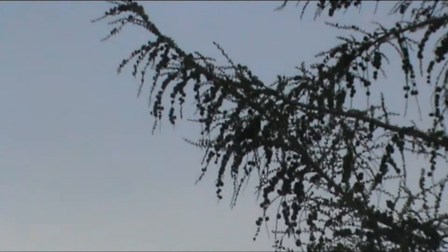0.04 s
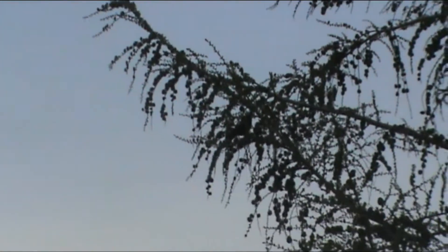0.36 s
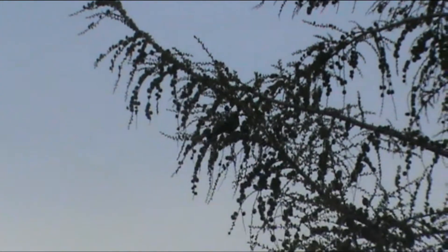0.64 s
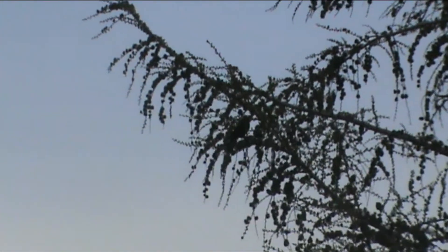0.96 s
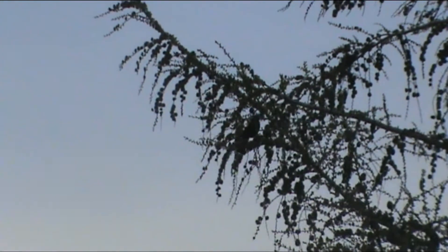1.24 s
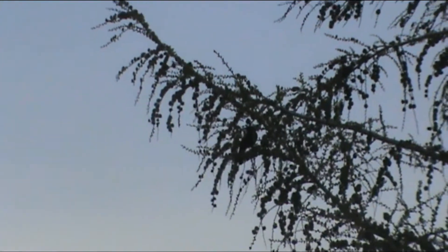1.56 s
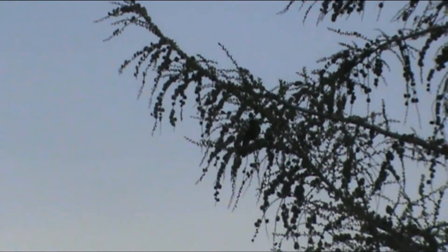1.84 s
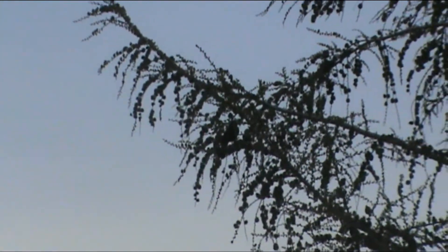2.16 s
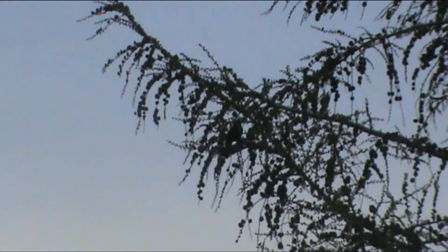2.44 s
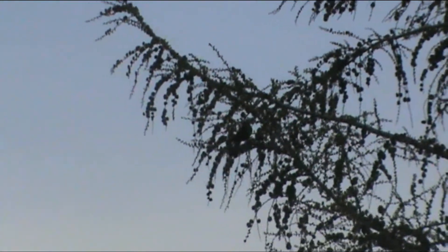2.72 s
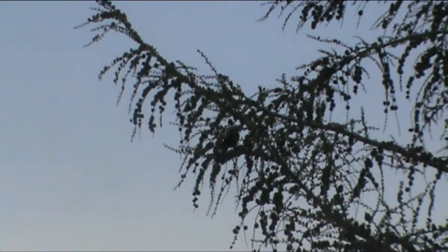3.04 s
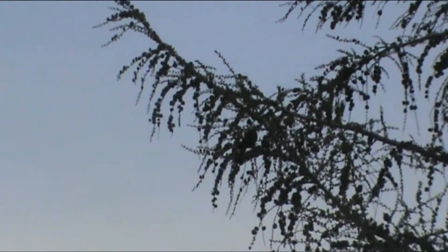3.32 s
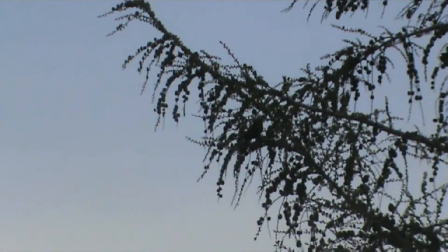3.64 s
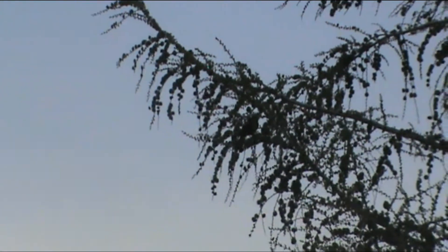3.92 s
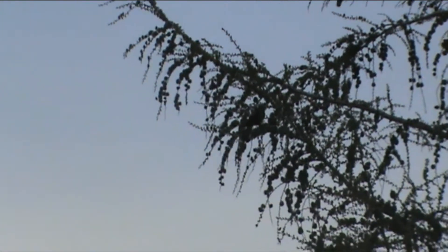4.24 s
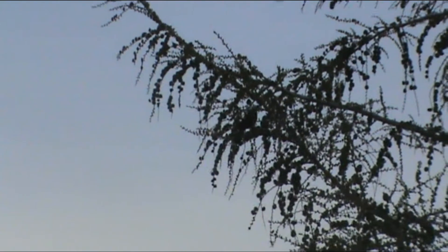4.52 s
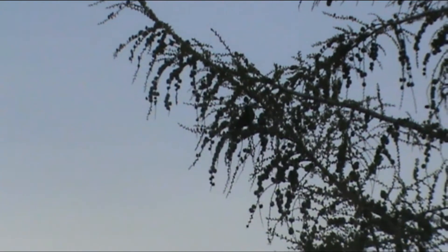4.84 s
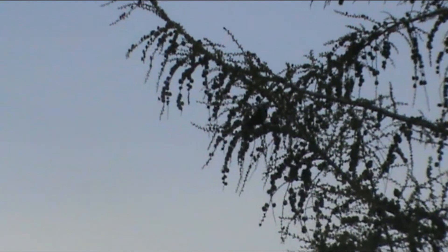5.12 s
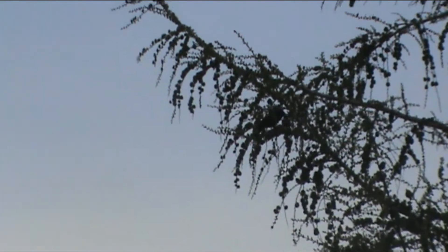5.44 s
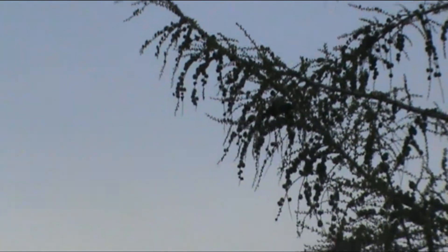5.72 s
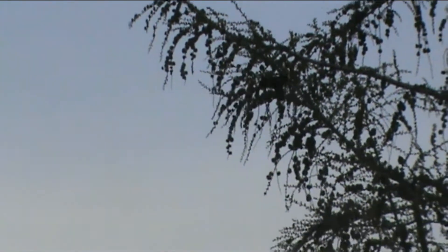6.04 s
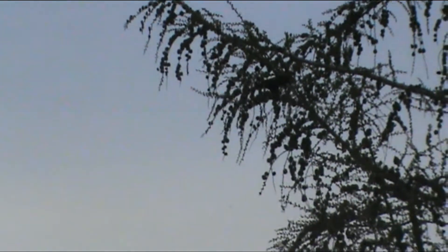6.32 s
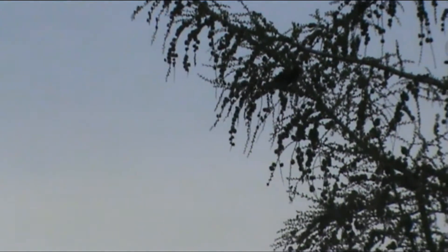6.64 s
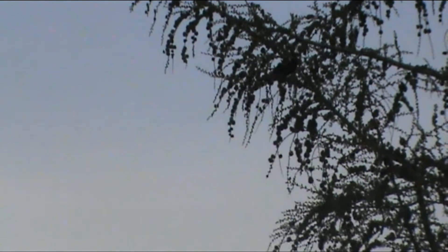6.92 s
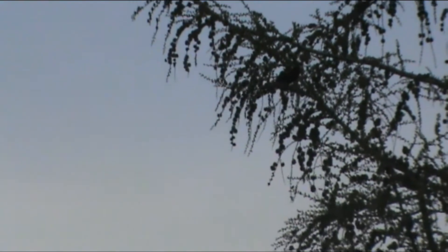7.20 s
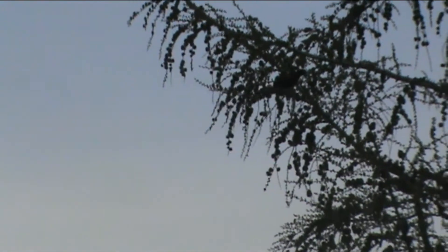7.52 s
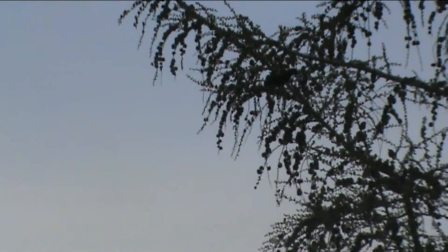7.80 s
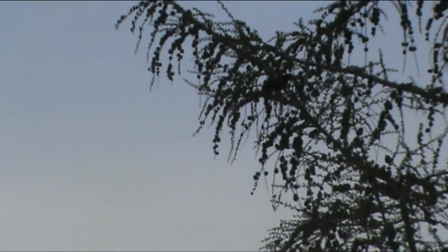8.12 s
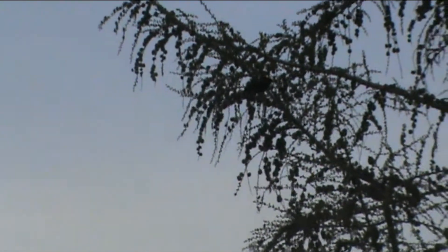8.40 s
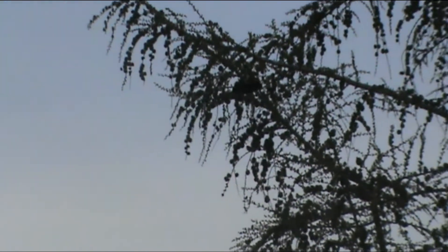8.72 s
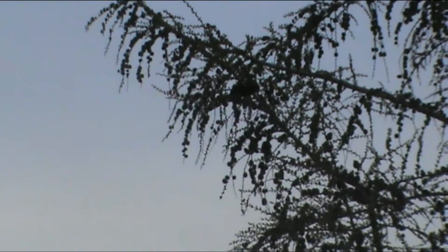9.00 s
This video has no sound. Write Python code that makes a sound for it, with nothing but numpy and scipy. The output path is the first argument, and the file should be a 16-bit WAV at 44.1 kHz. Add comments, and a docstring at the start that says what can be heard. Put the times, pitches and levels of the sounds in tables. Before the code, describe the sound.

Quiet distant traffic, leaf hiss, a low wavering hum and a hand-held camera's thin whine sound throughout. After a faint peep, a small bird in a larch whistles three quick, high, down-slurred notes at about 1 second, much louder than the background. Birds further off answer from 1.5 to 3 seconds, with a slight woodland echo. Twigs snap lightly near 3.3 and 4.8 seconds, and short raspy chips come near 2.4, 4.6 and 5.9. A faint far engine passes around 6 seconds, sinking in pitch. The near bird repeats its run at 6.3, overlapped by an answer, and faint calls follow. A hand softly bumps the camera near 3.4, 7 and 9 seconds. A small metal ring clinks against it faintly at 4.4, then several times from about 8.3. Just after 9 seconds the near bird whistles two more notes, along with a chip and a clink.

```python
"""Distant traffic, leaf hiss, a hum and a hand-held camera's thin whine sound throughout. Faint peeps
begin, then a small bird in a larch whistles a quick run of three down-slurred notes. A twig snaps,
birds answer from further off, and raspy chips follow. The hand bumps the camera and a metal ring
clinks on it. A far engine, sinking in pitch, passes at about 6 s; the birds call again, and the near
one starts a last run amid more clinks and bumps."""
import sys
import numpy as np
from scipy import signal
from scipy.fft import rfft, irfft
from scipy.io import wavfile
from scipy.ndimage import uniform_filter1d

SR = 44100
rng = np.random.default_rng(int(sys.argv[2]) if len(sys.argv) > 2 else 0)


def to_wav(sig):
    """Store sig (one row per channel, or 1-D mono) as 16-bit WAV at the path in sys.argv[1].

    Samples outside -1..1 are clipped; the rate is SR.
    """
    pcm = np.clip(np.atleast_2d(sig), -1, 1) * 32767
    pcm = np.round(pcm).astype(np.int16)
    wavfile.write(sys.argv[1], SR, pcm.T)  # frames by channels


N = 408366
TIME = np.arange(N) / SR


def gain_of(db):
    """Amplitude ratio of a level in decibels."""
    return 10 ** (np.asarray(db) / 20)


def unit_rms(x):
    """Normalisation to unit mean power."""
    return x / np.sqrt(np.mean(x ** 2) + 1e-20)


def curve_at(points, hz):
    """Linear interpolation on a log-frequency axis."""
    f, value = np.transpose(points)
    return np.interp(np.log(hz + 1), np.log(f + 1), value)


def add(mix, start_s, sound):
    """Superposition: a sound adds to the mix from start_s on."""
    part = mix[max(round(start_s * SR), 0):][:len(sound)]
    part += sound[:len(part)]


def phase_of(hz):
    """Phase is the time integral of frequency."""
    return 2 * np.pi * np.cumsum(hz) / SR


def noise(size, colour):
    """Spectral shaping: white noise weighted by colour(Hz) in dB, at unit power."""
    hz = np.fft.rfftfreq(size, 1 / SR)
    return unit_rms(irfft(rfft(rng.standard_normal(size)) * gain_of(colour(hz)), size))


def wander(size, hz):
    """Low-pass noise: a random drift with its cutoff at hz."""
    return noise(max(size, SR), lambda f: -20 * np.log10(1 + (f / hz) ** 4))[:size]


def band(size, hz, octaves):
    """Band-pass noise, 6 dB down at the given octaves either side of hz."""
    return noise(size, lambda f: -20 * np.log10(1 + (np.log2((f + 1) / hz) / octaves) ** 2))


def air(spectrum, db, motion, patchy_db):
    """Partly coherent stereo noise with drifting patches; motion scales the traffic's lull and hump."""
    # likeness of the two channels: (frequency [Hz], coherence [0-1])
    coherence = [(30, 0.98), (110, 1), (200, .92), (350, 0.55), (700, .5), (1400, 0.214), (2800, 0.033),
                 (5000, 0.12), (9000, 0.47), (13000, 1), (16000, 1)]
    # balance of the air: (frequency [Hz], left over right [dB])
    balance = [(30, -0.5), (250, -0.4), (700, 0.9), (2800, 0.3), (5000, 0), (9000, 0), (16000, -.2)]
    frames, hz = N // 512 + 5, np.fft.rfftfreq(2048, 1 / SR)
    t = np.linspace(0, N / SR, frames)[:, None]
    a, b, c, d, patches = rng.standard_normal((5, frames, len(hz)))
    patches = unit_rms(uniform_filter1d(uniform_filter1d(patches, size=10, axis=0), size=16, axis=1))
    alike = np.clip(curve_at(coherence, hz), -1, 1)
    left, independent = a + 1j * b, c + 1j * d
    spectra = np.array([left, alike * left + np.sqrt(1 - alike ** 2) * independent])
    lull = -1.6 * np.exp(-((t - 5.6) / 1.1) ** 2) * hz / (hz + 250)  # the tyre roar eases once
    hump_hz = 685 + (1130 - 685) * (1 - np.tanh((t - 4.3) / .9)) / 2  # sinks as a vehicle goes by
    hump = 2.2 * np.exp(-(np.log2((hz + 1) / hump_hz) / .16) ** 2)
    spectra *= gain_of(curve_at(spectrum, hz) + patchy_db * patches + motion * (lull + hump))
    spectra *= gain_of(np.outer([.5, -.5], curve_at(balance, hz)))[:, None]
    pair = signal.istft(spectra.transpose(0, 2, 1), nperseg=2048, noverlap=1536)[1][:, :N]
    return gain_of(db) * unit_rms(pair)


def traffic_and_leaves():
    """Broadband noise: distant traffic fills the bass and middle, leaves the treble."""
    # spectra of traffic and of leaves: (frequency [Hz], relative spectral density [dB])
    wash = [(12, -30), (22, -17), (38, -13.5), (50, -6), (90, -2.5), (125, -4.5), (200, -7), (330, -13),
            (490, -10.5), (750, -11.5), (1400, -15.5), (2050, -19), (2500, -22), (3300, -47.5)]
    hiss = [(1500, -34.5), (2400, -15), (2700, 2), (3300, 1), (4200, -1.5), (6000, -4), (9000, -5.5),
            (13000, -7.5), (15000, -7), (15800, -4.5)]
    return air(wash, db=-49.5, motion=.93, patchy_db=.73) + air(hiss, db=-58.5, motion=.57, patchy_db=.7)


def engine():
    """Doppler shift: a steadily sinking drone drops further as it passes, where it is loudest."""
    start_hz, sink_hz_per_s, drop_hz, pass_s = 286.5, 9.3, 15.5, 6.05
    since = TIME - pass_s
    hz = start_hz - sink_hz_per_s * TIME - drop_hz * (1 + np.tanh(since / .5)) / 2
    hz *= 1 + .0061 * wander(N, 8.1)
    db = -63.5 + 6.5 / (1 + (since / 1.45) ** 2)
    return gain_of(db + 2 * wander(N, 5.5)) * np.sin(phase_of(hz))


def hum():
    """Random amplitude and frequency modulation make a low tone waver."""
    db = -59.5 + 2 * wander(N, 3.4)
    hz = 101.7 + 2.62 * wander(N, 4.9)
    return gain_of(db) * np.sin(phase_of(hz))


def camera_whine():
    """Two close tones beat at their difference frequency."""
    hz, db = (15735, 15748.4), (-64.5, -70)
    return gain_of(db) @ np.sin(2 * np.pi * np.outer(hz, TIME))


def peeps(sag, hoarse_hz, stray_count):
    """Random frequency modulation makes faint, sagging bird notes hoarse; fainter strays fall by chance."""
    # faint calls: (time [s], level [dB], pitch [Hz])
    calls = [(.439, -51, 3570), (.966, -53, 3050), (2.0, -53, 3150), (2.794, -54, 2100), (3.298, -55, 2750),
             (5.083, -53, 2120), (5.22, -54.5, 2810), (7.267, -49, 1339), (7.312, -51, 1430),
             (7.415, -53, 1607), (7.946, -53.5, 3040), (8.248, -51, 2990)]
    strays = [(when * N / SR, -62, np.interp(high, [0, 1], (2700, 3900)))
              for when, high in rng.random((stray_count, 2))]
    out, cycles = np.zeros(N), 85
    for centre_s, db, hz in calls + strays:
        length = cycles / hz  # lower peeps last longer
        u = np.linspace(-1, 1, int(length * SR))
        pitch = hz * (1 - sag * u / 2) + hoarse_hz * wander(len(u), 400)
        add(out, centre_s - length / 2, gain_of(db) * np.cos(np.pi * u / 2) * np.sin(phase_of(pitch)))
    return out


def outdoors(x, branches_db, decay_s, wood_db):
    """Reverberation: quick reflections off branches and the wood's tail, in dB against the direct sound."""
    # decay of the wood: (frequency [Hz], reverberation time [s])
    wood_t60 = [(500, 0.55), (3000, .5), (5000, 0.83), (10000, .5), (16000, .3)]
    t = np.arange(SR) / SR
    twigs, trunks = rng.standard_normal((2, 2, SR)) * (rng.random((2, 2, SR)) < 2000 / SR)
    quick = twigs * np.exp(-t / decay_s) * (t > .002)
    hz, when, spectra = signal.stft(trunks * np.minimum(t / .027, 1), SR, nperseg=256)
    decay = gain_of(-60 * when / curve_at(wood_t60, hz)[:, None])
    tail = signal.istft(spectra * decay, SR, nperseg=256)[1][:, :SR]
    echo = gain_of(branches_db) * quick / np.linalg.norm(quick[0])
    echo += gain_of(wood_db) * tail / np.linalg.norm(tail[0])
    return x + signal.fftconvolve(x[None], echo, axes=1)[:, :N]


def whistles(notes, leap, slur_s, octave_db, press_db_per_hz, twelfth_db, onset_db, fade_power,
             waver, rasp, flick, flick_db, catch_db, end_bend):
    """A gliding tone of three harmonics: each note flicks, catches, slurs down to a held pitch and fades."""
    attack_s, tremble_db = .0018, 1.7
    leap_kept, slur_kept = .79, .94  # each note of a run leaps less and slurs sooner than the last
    out, usual_hz = np.zeros(N), np.mean([held_hz for *_, held_hz, db in notes])
    for k, (start_s, length, swell_s, held_hz, db) in enumerate(notes):
        place = k % 3
        t = np.arange(int(length * SR)) / SR
        u, crest = t / length, np.clip(swell_s / length, .1, .9)
        tension = np.exp(-(t / (slur_s * slur_kept ** place)) ** 1.45)  # lingers, then slides
        kick = np.exp(-((t - .0035) / .0011) ** 2)
        catch = np.exp(-((t - .011) / .0046) ** 2)
        hz = held_hz * (1 + leap * leap_kept ** place * tension * (1 - np.exp(-t / .00087)))
        # the voice is unsteady while it slides and settles on the held pitch
        jitter = waver * wander(len(t), 70) + rasp * tension * wander(len(t), 300)
        phase = phase_of(hz * (1 + flick * kick + end_bend * u ** 6 + jitter))
        tremble = tremble_db * (1 - u) * wander(len(t), 120)
        rise_db = onset_db * np.maximum(1 - u / crest, 0) ** 2.6
        swell = gain_of(rise_db + flick_db * kick + catch_db * catch + tremble)
        fade = np.cos(np.pi / 2 * np.clip((u - crest) / (1 - crest), 0, .999)) ** fade_power
        push = swell * fade * np.sin(np.pi / 2 * np.minimum(t / attack_s, 1)) ** 2
        press_db = press_db_per_hz * (held_hz - usual_hz)  # a higher note is pressed harder
        octave = gain_of(octave_db + press_db + 7 * tension + 2 * wander(len(t), 50)) * np.sin(2 * phase)
        twelfth = gain_of(twelfth_db) * push * np.sin(3 * phase)
        add(out, start_s, gain_of(db) * push * (np.sin(phase) + octave + twelfth))
    return out


def off_axis(pair, lag_samples, pan_db, treble_pan_db):
    """Time and level differences: sound reaches the right port late, and the housing shades the treble."""
    hz = np.fft.rfftfreq(N, 1 / SR)
    left_over_right_db = curve_at([(6500, pan_db), (9000, treble_pan_db)], hz)
    half = gain_of(left_over_right_db / 2) * np.exp(1j * np.pi * hz * lag_samples / SR)
    return irfft(rfft(pair) * np.array([half, 1 / half]), N)


def whistling_birds():
    """Three birds: with distance, the direct sound weakens against the reverberation of the wood."""
    # each bird's notes: (time [s], length [s], time to swell [s], held pitch [Hz], level [dB])
    near_notes = [ (.8675, .104, .042, 5068, -21.3), (.9685, .086, .043, 5108, -18.6),
                  (1.061, .124, .083, 5064, -16.4), (6.3325, .09, .069, 5155, -24.4),
                  (6.429, .106, .056, 5125, -21.2), (6.538, .111, .096, 5189, -21.2),
                  (9.1455, .087, .045, 5100, -25.4), (9.243, .097, .045, 5190, -19)]
    far_notes = [ (1.477, .077, .02, 4980, -53), (1.58, .076, .055, 5040, -55),
                 (1.68, .11, .065, 5035, -50), (2.57, .13, .07, 4770, -70.5), (2.68, .096, .05, 4830, -68),
                 (2.8, .13, .065, 4830, -70), (7.543, .06, .025, 5020, -61), (7.645, .099, .05, 5090, -70),
                 (7.75, .14, .07, 5080, -63.5)]
    answer_notes = [ (1.803, .105, .06, 4860, -51), (1.913, .097, .025, 4795, -46),
                    (2.026, .132, .088, 4800, -44.5), (6.425, .1, .04, 4725, -48),
                    (6.535, .097, .045, 4740, -41.8), (6.646, .125, .035, 4725, -42.3)]
    near = whistles(near_notes, leap=.192, slur_s=.0245, octave_db=-21, press_db_per_hz=.06,
                    twelfth_db=-30, onset_db=-18, fade_power=1.4, waver=.0015, rasp=.019,
                    flick=.04, flick_db=3.5, catch_db=-3.2, end_bend=-.002)
    far = whistles(far_notes, leap=.14, slur_s=.02, octave_db=-30, press_db_per_hz=0,
                   twelfth_db=-40, onset_db=-16, fade_power=1.1, waver=.0016, rasp=.004,
                   flick=.03, flick_db=-5, catch_db=-1, end_bend=0)
    answer = whistles(answer_notes, leap=.18, slur_s=.021, octave_db=-15.5, press_db_per_hz=.085,
                      twelfth_db=-27, onset_db=-7, fade_power=1.0, waver=.0045, rasp=.031,
                      flick=.06, flick_db=2, catch_db=-2, end_bend=.012)
    near = outdoors(near, branches_db=-10, decay_s=.024, wood_db=-29)
    return (off_axis(near, lag_samples=.35, pan_db=1, treble_pan_db=-3)
            + outdoors(far, branches_db=-8, decay_s=.03, wood_db=-6)
            + outdoors(answer, branches_db=-2, decay_s=.051, wood_db=-8))


def twig_snaps(fall_s=.0043, octaves_per_hz=.00018):
    """Brittle fracture: noise bursts that die within milliseconds, the brighter ones broader."""
    # dry twigs breaking: (time [s], level [dB], centre frequency [Hz])
    snaps = [(1.35, -57, 6500), (2.474, -53, 4500), (3.253, -40.5, 3080), (4.842, -42, 2240)]
    out, t = np.zeros(N), np.arange(2048) / SR
    for start_s, db, hz in snaps:
        add(out, start_s, gain_of(db) * np.exp(-t / fall_s) * band(len(t), hz, octaves_per_hz * hz))
    return out


def chips():
    """Source and filter: rough air excites a bird's throat resonances; loud chips are harsher, shorter."""
    # raspy calls: (time of peak [s], level [dB])
    calls = [(2.377, -45), (2.41, -57), (4.524, -52), (4.561, -33.3), (5.863, -43.5), (5.92, -55),
             (8.81, -48), (9.204, -35.5)]
    # throat spectra: (frequency [Hz], relative level [dB])
    soft_rasp = [(900, -22), (1800, -6), (2600, -7), (3170, 0), (3550, -7.5), (4050, -5), (4600, -16.5),
                 (6000, -20), (8500, -26), (16000, -40)]
    harsh_rasp = [(1200, -21), (2600, -22), (3100, -12.5), (3450, -4), (3790, -21.5), (4350, 1.5),
                  (4750, -13), (5100, -16.5), (5700, -33), (8500, -30), (12000, -40), (16000, -42)]
    soft_db, harsh_db, flutter_hz = -45.5, -35, 170
    soft_rise_s, soft_fall_s = .008, .012
    out, t = np.zeros(N), np.arange(-2048, 4096) / SR
    flutter = 1 + .32 * np.cos(2 * np.pi * flutter_hz * t)
    for peak_s, db in calls:
        harsh = np.clip((db - soft_db) / (harsh_db - soft_db), 0, 1)
        envelope = np.exp(-np.where(t < 0, -t / soft_rise_s, t / soft_fall_s) / (1 - .3 * harsh))
        rush = noise(len(t), lambda f: (1 - harsh) * curve_at(soft_rasp, f)
                     + harsh * curve_at(harsh_rasp, f))
        add(out, peak_s + t[0], gain_of(db) * envelope * flutter * rush)
    return out


def hand_bumps():
    """Soft impact: a hand on the housing excites mainly low frequencies."""
    # bumps: (time of peak [s], level [dB], decay time [s])
    bumps = [(3.36, -53.5, .019), (7.046, -48, .011), (9.0, -49, .03), (9.095, -51, .014)]
    out, t = np.zeros(N), np.arange(SR // 4) / SR
    for peak_s, db, fall_s in bumps:
        envelope = t / fall_s * np.exp(1 - t / fall_s)
        add(out, peak_s - fall_s, gain_of(db) * envelope * band(len(t), hz=420, octaves=.56))
    return out


def ring_clinks():
    """Modal vibration: a small metal ring taps the camera with a dry tick, and its modes ring down."""
    # taps: (time [s], ringing level [dB], tick level [dB])
    taps = [(4.4, -53.5, -62), (7.637, -66, -51), (8.295, -47.5, -47), (8.853, -52, -49.5),
            (8.868, -53, -57), (8.956, -45, -41.5), (9.243, -40.5, -37)]
    # modes of the ring: (frequency [Hz], level before tilt [dB], time to fall 60 dB [s])
    modes = [(4210, -3.5, 0.095), (7350, -2, 0.11), (7450, 2, 0.021), (10700, -27, .08), (11470, -11, 0.13),
             (13360, -10, .11)]
    tick_fall_s, tilt_db_per_octave, pivot_hz = .0052, 6, modes[1][0]
    out, t = np.zeros(N), np.arange(SR // 4) / SR
    for start_s, ring_db, tick_db in taps:
        tick = np.exp(-t / tick_fall_s) * band(len(t), hz=12200, octaves=.5)
        add(out, start_s, gain_of(tick_db) * tick)
        for hz, mode_db, t60 in modes:
            db = ring_db + mode_db + tilt_db_per_octave * np.log2(hz / pivot_hz)
            add(out, start_s, gain_of(db - 60 * t / t60) * np.sin(2 * np.pi * (hz * t + rng.random())))
    return out


def scene():
    """Superposition of the steady background, the sounds of the wood and the camera's own noises."""
    return (traffic_and_leaves() + engine() + hum() + camera_whine()
            + outdoors(peeps(sag=.03, hoarse_hz=150, stray_count=4),
                       branches_db=-9, decay_s=.018, wood_db=-11)
            + whistling_birds()
            + outdoors(twig_snaps() + chips(), branches_db=-15, decay_s=.03, wood_db=-20)
            + hand_bumps() + ring_clinks())


def record(dry):
    """Band limiting: a steep low-pass filter removes the highest treble."""
    low_pass = signal.firwin(511, cutoff=15900, window=("kaiser", 9), fs=SR)
    return signal.oaconvolve(dry, low_pass[None], "same", axes=1)


dry = scene()
out = record(dry)
to_wav(out)
```